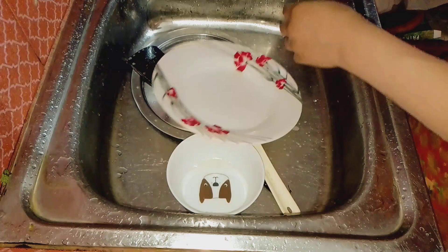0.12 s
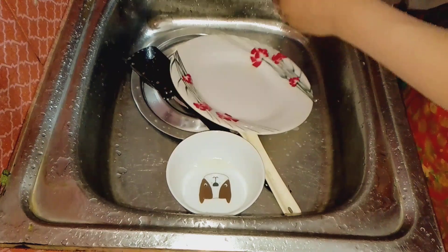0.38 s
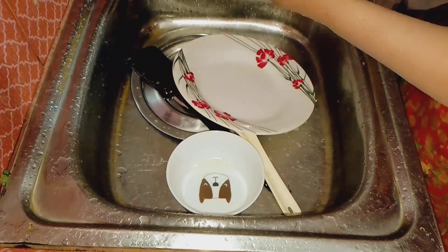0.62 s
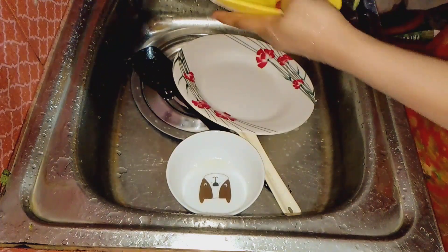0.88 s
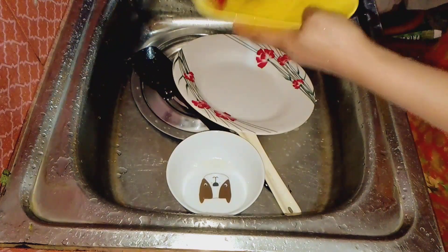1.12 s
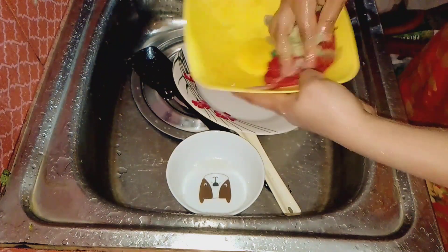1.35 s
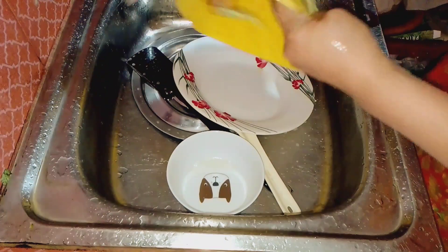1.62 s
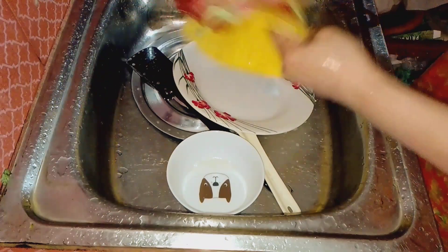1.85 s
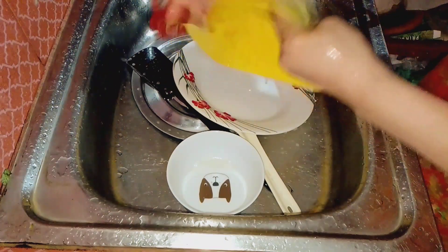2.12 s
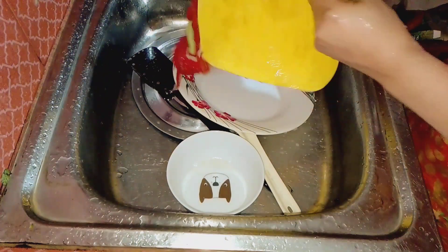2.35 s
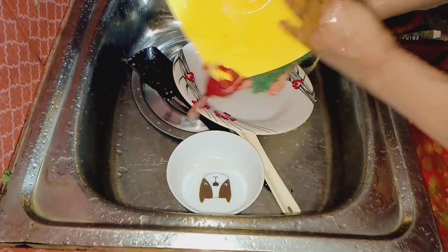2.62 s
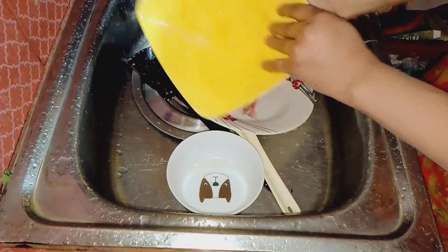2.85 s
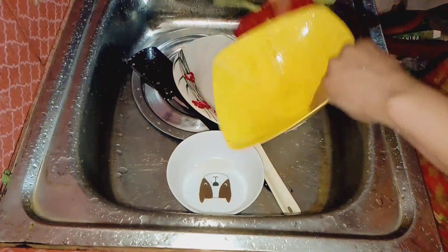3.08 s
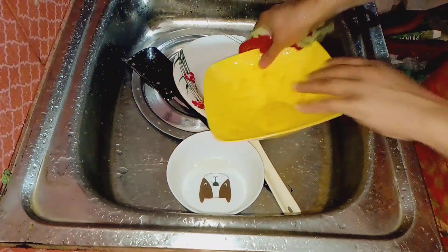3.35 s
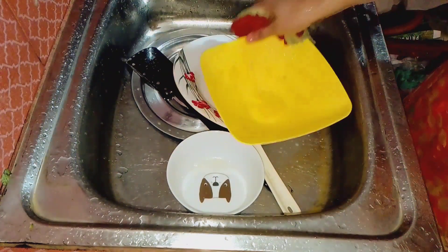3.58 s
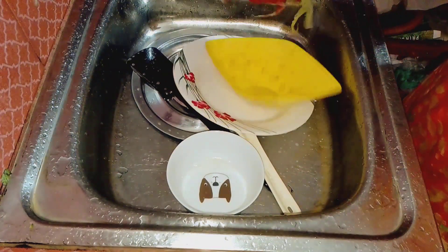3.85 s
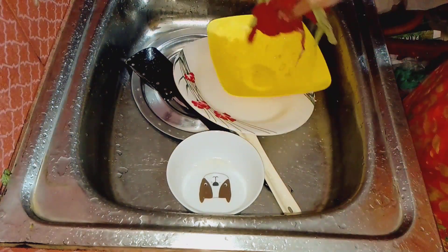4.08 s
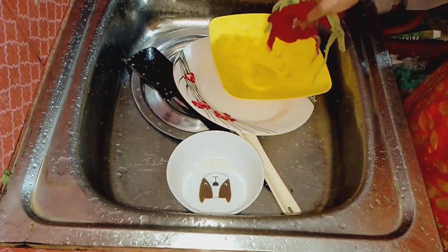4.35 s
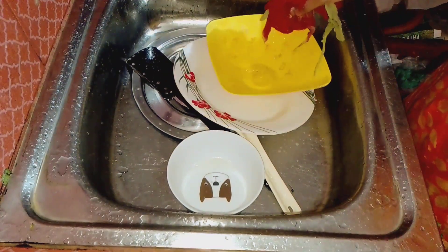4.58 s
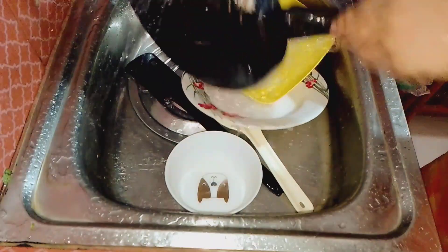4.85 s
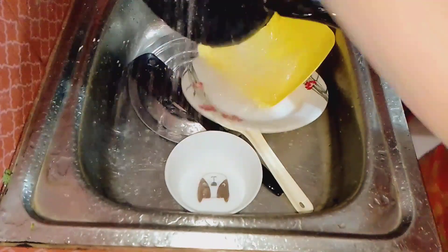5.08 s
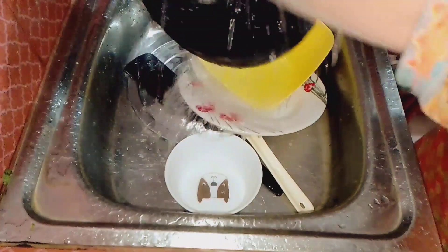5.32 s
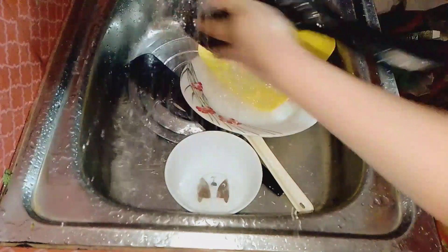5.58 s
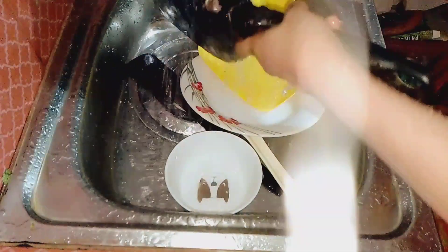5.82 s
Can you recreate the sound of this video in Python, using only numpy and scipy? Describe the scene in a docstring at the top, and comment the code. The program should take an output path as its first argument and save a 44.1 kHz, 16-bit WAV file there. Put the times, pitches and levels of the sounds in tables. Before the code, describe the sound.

A close microphone at a metal basin catches a half second of loud plate clatter, then faint sponge hiss with tiny squeaks over low room noise. Two clusters of dull and sharp dish knocks come next. Abruptly the tap is running: pan knocks, water drumming on metal, bright splashing and bubbling until the end, in a small hard kitchen.

```python
"""Washing up at a steel sink

Plates and a plastic dish clatter, a sponge scrubs the dish, then a pan knocks under a splashing, gurgling tap.
Contacts excite decaying modes; sponge, spray, drumming and room are coloured noise; bubbles are gliding tones.
Two edits leave a few milliseconds of silence; the second ends scrub and murmur and starts the tap."""
import sys
import numpy as np
from scipy import signal
from scipy.fft import rfft, irfft
from scipy.io import wavfile
from scipy.ndimage import uniform_filter1d

SR = 44100
rng = np.random.default_rng(int(sys.argv[2]) if len(sys.argv) > 2 else 0)


def materialize(psi):
    """Save the field psi as 16-bit PCM at rate SR to the path in sys.argv[1].

    A 1-D psi becomes a single channel; in a 2-D psi each row is a channel.
    """
    bounded = np.clip(np.atleast_2d(psi).T, -1, 1)
    quanta = np.round(bounded * 32767).astype(np.int16)
    wavfile.write(sys.argv[1], SR, quanta)


def gain_from_db(level_db):
    """Convert decibel levels to linear amplitude factors (20 dB per decade)."""
    decades = np.asarray(level_db, float) / 20
    return 10 ** decades


N = 262395
T = np.arange(N) / SR

# Silent gaps at the edits. Each row: start in seconds, end in seconds.
GAPS = [(1.527, 1.532), (4.665, 4.679)]
SCRUB_END_S, TAP_ON_S = GAPS[1]


def colour(x, points):
    """Causal minimum-phase filter by (Hz, dB) points, made from the folded cepstrum."""
    hz, db = np.transpose(points)
    size = 8192
    grid_hz = np.arange(size // 2 + 1) * SR / size
    log_gain = np.interp(np.log(grid_hz + 1), np.log(hz), db) * np.log(10) / 20
    cepstrum = irfft(log_gain)
    cepstrum[1:size // 2] *= 2
    cepstrum[size // 2 + 1:] = 0
    response = irfft(np.exp(rfft(cepstrum)))
    return signal.fftconvolve(x, response)[:len(x)]


def band(x, lo_hz, hi_hz):
    """Butterworth band-pass."""
    return signal.sosfilt(signal.butter(2, [lo_hz, hi_hz], "bandpass", fs=SR, output="sos"), x)


def unit(x, lo_hz, hi_hz):
    """Scale so that one band has rms 1."""
    return x / np.std(band(x, lo_hz, hi_hz))


def above(x, hz, order=4):
    """The share of x above hz, with no phase turn."""
    f = np.arange(len(x) // 2 + 1) * SR / len(x)
    return irfft(rfft(x) / (1 + (hz / (f + 1)) ** order), len(x))


def walk(rate_hz):
    """Random levels held 1 / rate_hz and slewed twice; spread 1."""
    k = int(SR / rate_hz)
    held = np.repeat(rng.standard_normal(N // k + 1), k)
    w = uniform_filter1d(uniform_filter1d(held, k), k)[:N]
    return w / np.std(w)


def patchy(x, depth_db, rate_hz):
    """Neighbouring frequency slices of a noise swell and sink on their own."""
    edges_hz = 900 * 1.17 ** np.arange(14)
    tops = [x] + [above(x, f, order=16) for f in edges_hz]
    slices = [a - b for a, b in zip(tops, tops[1:])]
    return tops[-1] + sum(part * gain_from_db(depth_db * walk(rate_hz)) for part in slices)


def clicks(size, rate_hz, spread_db):
    """Random contacts; an exponential draw lifts some (spread_db > 0) or weakens some (< 0)."""
    hit = rng.random(size) < rate_hz / SR
    spread = np.minimum(rng.exponential(size=size), 3.)
    return hit * rng.standard_normal(size) * gain_from_db(spread_db * spread)


def fade(t, t60):
    """Exponential decay, 60 dB in t60."""
    return np.exp(-np.log(1000) * t / t60)


def add(out, s, sound):
    """Mix a sound in at s seconds."""
    i = int(s * SR)
    out[i:i + len(sound)] += sound[:N - i]


def kitchen(x, wet_db):
    """Tiled walls: a noise tail, drawn anew per call, that dies sooner in the treble."""
    # Reverberation. Each row: frequency in Hz, t60 in seconds.
    tail_t60 = [(200, 0.34), (1000, 0.28), (4000, 0.26), (12000, 0.25)]
    t, (hz, t60_s) = T[:SR // 2], np.transpose(tail_t60)
    tail = np.zeros(len(t))
    for f in 125 * 2. ** np.arange(7):
        octave = band(rng.standard_normal(len(t)), f / 2 ** .5, f * 2 ** .5)
        tail += octave * fade(t, np.interp(np.log(f), np.log(hz), t60_s))
    tail = tail * np.clip(t / 0.0071, 0, 1)
    return x + gain_from_db(wet_db) * signal.fftconvolve(x, tail / np.linalg.norm(tail))[:len(x)]


def struck(modes, damping):
    """Unit-energy response to one tap: decaying modes in a mix that varies with the spot."""
    t = T[:SR // 2]
    hz, db, t60_s = (c[:, None] for c in np.transpose(modes))
    db = db + 4.4 * rng.standard_normal(db.shape)
    sound = np.sum(gain_from_db(db) * np.sin(2 * np.pi * hz * t) * fade(t, damping * t60_s), axis=0)
    return sound / np.linalg.norm(sound)


def body(contact, s, ring_hz, ring_db):
    """Contacts crack, ring the touched spot and shake the basin and the plate or pan in hand at s."""
    # Modes of the steel basin with its dishes, the china plate and the steel pan.
    # Each row: frequency in Hz, mean relative level in dB, t60 in seconds before the damping factor.
    basin_modes = [(298.6, 5.5, 0.98), (547.5, 4, 0.63), (653, -4.5, 0.86), (796, -8, 0.61),
                   (1010, -4, 0.53), (1030, -24, 0.53), (1180, -10, 0.26), (1287, -16, 0.18),
                   (1306, -19.5, 0.32), (1645, -13, 0.21), (1619, -14, 0.33), (1780, -27, 0.26),
                   (1960, -24, 0.29), (2110, -16, 0.98), (2440, -10, 0.31), (2380, -13, 0.17),
                   (2799, -21, 0.31), (2900, -9, 0.12), (3150, -25, 0.33), (3300, -4, 0.15),
                   (3620, -35, 0.8), (3700, -17, 0.35), (4140, -27, 0.26), (4740, -26, 0.15)]
    plate_modes = [(1246, 6, 0.056), (1502, -1.5, 0.1), (2150, -5, 0.57), (2400, -4, 0.18),
                   (2940, -11, .25), (3100, -10, 0.16), (3480, -2.5, 0.099), (3650, -18, 0.11),
                   (4710, -11.5, 0.18), (5110, -30, 0.052), (5940, -17, 0.11)]
    pan_modes = [(307, -6, 0.27), (366, -7, 0.18), (526, 0, 0.76), (606, -9, 0.3), (717, 0.5, 0.37),
                 (950, 3, 0.12), (1130, -19, 0.059), (1290, -13, .15), (1480, -19, 0.13), (1645, -22, 0.13),
                 (2030, 6, 0.055)]
    # Spectrum of the crack. Each row: frequency in Hz, relative density in dB per Hz.
    crack_colour = [(30, -43), (90, -15), (150, -48.5), (200, 1.5), (290, 3), (400, 3), (530, 1.5),
                    (1400, 4), (2500, -1), (4500, -11.5), (7500, -35.5), (10000, -37.5), (13000, -50),
                    (15500, -49)]
    piece = 0
    if s < 1:
        piece = gain_from_db(-9.5) * struck(plate_modes, 0.54)
    elif s > SCRUB_END_S:
        piece = gain_from_db(-7) * struck(pan_modes, 1.0)
    spot = gain_from_db(ring_db) * struck([(ring_hz, 0, .04)], 0.99)
    crack = colour(np.eye(1, SR // 2)[0], crack_colour)
    rings = colour(gain_from_db(-8.5) * struck(basin_modes, 0.29) + piece + spot, [(150, -20.0), (200, 0.5)])
    return signal.fftconvolve(contact, crack / np.linalg.norm(crack) + rings)[:len(contact)]


def slide():
    """The plate grates across the pile before it settles: dense contacts ring plate and basin."""
    # Grating level. Each row: time in seconds, level in dB.
    slide_levels = [(0, -25), (.05, -24), (.09, -24), (.11, -27.5), (.17, -23.5), (.22, -23), (0.298, -46)]
    s, db = np.transpose(slide_levels)
    t = T[:SR // 2]
    contact = clicks(len(t), rate_hz=3500.0, spread_db=1.0)
    grate = kitchen(body(contact, 0, 1315.0, -2.5), wet_db=-3.0)
    out = np.zeros(N)
    add(out, 0, gain_from_db(np.interp(t, s, db, right=-120)) * grate / np.std(grate))
    return out


def murmur():
    """Low room noise that the basin colours, over a soft steady hiss."""
    # Low noise level. Each row: time in seconds, mean level in dB.
    murmur_levels = [(.72, -51.5), (.9, -60.5), (1.15, -56.5), (1.5, -60), (2.05, -61.5), (2.2, -60),
                     (3.38, -58.5), (3.85, -54), (4.27, -59), (4.66, -61.5)]
    # Spectra of low noise and hiss. Each row: frequency in Hz, relative density in dB per Hz.
    room_colour = [(12, -28), (20, -11), (22, -49), (59, -12), (75, -22), (96, -4.5), (157, -36),
                   (185, -13), (251, -13.5), (290, 0.5), (329, -5), (642, -13), (990, -12.5), (1500, -12),
                   (1950, -17), (3300, -120)]
    hiss_colour = [(470, -28), (800, -8.5), (952, -15), (1230, -16), (1430, -8.5), (3540, -8), (6670, -29),
                   (8760, -29), (12700, -46), (15500, -52)]
    s, db = np.transpose(murmur_levels)
    level_db = np.interp(T, s, db) + 1.8 * walk(10.0)
    low = unit(colour(rng.standard_normal(N), room_colour), 200, 555)
    hiss = unit(colour(rng.standard_normal(N), hiss_colour), 1430, 5300)
    return gain_from_db(level_db) * low + gain_from_db(-62) * hiss


def scrub():
    """Wet sponge on plastic: fine hiss with foam crackle, driven by strokes that speed up, hold and slow."""
    # Strokes. Each row: start in seconds, length in seconds, level in dB, treble lift in dB.
    strokes = [(0.67, .19, -56, -5), (0.9, 0.36, -54.5, -1.5), (1.043, 0.2, -51.5, -4),
               (1.175, .26, -52.5, 0), (1.428, 0.16, -50.5, -4), (1.53, 0.28, -52, 3),
               (1.816, 0.24, -51, 1.5), (2.043, 0.35, -51, 3.5), (2.367, 0.47, -50.5, 1.5),
               (2.78, 0.14, -52, -4.5), (2.877, 0.33, -51.5, 1), (3.173, 0.18, -49, -4.5),
               (3.625, 0.28, -56.5, -4.5), (4.345, 0.075, -58, -1)]
    # Spectrum of the rub. Each row: frequency in Hz, relative density in dB per Hz.
    sponge_colour = [(290, -32), (500, -11), (638, -23), (1040, -5.5), (1130, -13), (1390, -13),
                     (1820, -3.5), (2390, -1), (2570, -0.5), (3960, -2), (7450, -17.5), (9370, -15),
                     (12700, -30.5), (15500, -26)]
    creep_db, creep_treble_db, creep_end_s = -57, -7, 3.7  # faint steady rub under the strokes
    rise_s, fall_s, treble_power = 0.056, 0.078, 0.99  # treble amplitude goes as speed ** treble_power
    power = gain_from_db(2 * creep_db) * (T < creep_end_s)
    treble = power * gain_from_db(2 * creep_treble_db)
    for s, length_s, level_db, treble_db in strokes:
        speed = np.clip(np.minimum((T - s) / rise_s, (s + length_s - T) / fall_s), 0, 1)
        power = power + (gain_from_db(level_db) * speed) ** 2
        treble = treble + (gain_from_db(level_db + treble_db) * speed ** treble_power) ** 2
    crackle = 0.54 * clicks(N, rate_hz=1600.0, spread_db=-3.0)
    rub = colour(rng.standard_normal(N) + crackle, sponge_colour)
    rub = unit(patchy(rub, depth_db=2.5, rate_hz=16.0), 1740, 4300)
    high = above(rub, 5600.0)
    return np.sqrt(power) * (rub - high) + np.sqrt(treble) * high


def knocks():
    """Each knock is a blow and a dying chatter of re-contacts."""
    # Knocks. Each row: start in seconds, rms level of the first 33 ms in dB, ring of the touched
    # spot in Hz, bass lift in dB, treble lift in dB.
    blows = [(0.015, -46, 1270, 2, 15), (0.053, -30, 1350, 2, -5), (0.062, -19, 620, 6, 3.5),
             (0.086, -16, 837, -3.5, 0.5), (0.12, -12, 2150, -5.5, -0.5), (0.19, -18.5, 1380, 3, -13),
             (0.266, -27, 1350, 3.5, 3), (0.378, -15.5, 1310, 0.8, 1.5), (0.394, -14.5, 1220, 1.5, 2),
             (0.411, -19, 980, 6.5, 0), (0.431, -20.5, 1270, 3, -34), (0.472, -16.5, 2440, 4.5, 2),
             (0.495, -16, 1530, -13, -5.5), (0.534, -21.5, 1030, 3, 3.5), (3.406, -20.5, 1550, 11.5, 2.5),
             (3.421, -21, 907, -3, -0.5), (3.44, -24.5, 796, -8, -3.5), (3.833, -53, 1460, 6, 10),
             (3.872, -12.5, 2030, 2, 3), (3.9, -18, 974, -1, 3.5), (3.93, -14.5, 1530, -3, 0.6),
             (3.95, -21, 1460, 1.5, 2.5), (4.011, -16, 1014, -6.5, 1), (4.05, -23.5, 950, 1.5, -8),
             (4.682, -21, 720, 9, 0.6), (4.695, -15.5, 525, 2.5, 0), (4.734, -21, 1450, -4, 5.5),
             (4.801, -16, 1325, -2.5, 2), (4.89, -23, 2100, -2.5, 12), (4.963, -21, 975, -10, 8.5),
             (5.147, -20.5, 1100, -12.5, 1), (5.164, -19.5, 950, -4, -6), (5.185, -28, 412, 0.5, -4),
             (5.5, -28, 3340, -3, 17.5)]
    chatter_t60_s, spot_db, neutral_push_s = 0.064, -8.5, .00135
    out, t = np.zeros(N), T[:SR // 2]
    for s, level_db, ring_hz, bass_db, treble_db in blows:
        contact = clicks(len(t), rate_hz=3500., spread_db=2.) * fade(t, chatter_t60_s)
        push_s = neutral_push_s * gain_from_db(bass_db)  # a duller blow is a longer push
        contact = contact * np.clip(t / push_s, 0, 1)
        contact[0] = min(3., 0.0023 / push_s)
        tilt = [(320, bass_db), (750, 0), (2500, 0), (4000, treble_db)]
        sound = colour(body(contact, s, ring_hz, spot_db), tilt)
        sound = kitchen(sound, wet_db=-3.5)
        attack = np.std(sound[:SR // 30])
        add(out, s, gain_from_db(level_db) * sound / attack)
    return out


def squeaks():
    """The sponge catches briefly and one patch of the dish sings roughly: narrow-band noise."""
    # Squeaks. Each row: start in seconds, level at full swell in dB, pitch in Hz, length in seconds.
    catches = [(1.1, -48, 1830, 0.056), (1.115, -54, 2600, 0.078), (1.261, -53, 1090, 0.074),
               (1.619, -50, 2250, .06), (2.156, -53, 444, 0.11), (3.072, -50, 1020, 0.051),
               (4.359, -60, 3200, 0.071)]
    out, t = np.zeros(N), T[:SR // 4]
    for s, db, hz, length_s in catches:
        tone = band(rng.standard_normal(len(t)), hz / 1.03, hz * 1.03)
        swell = np.sin(np.pi * np.clip(t / max(length_s, .01), 0, 1)) ** 2
        add(out, s, gain_from_db(db) * swell * tone / np.std(tone))
    return out


def bubbles(rows, cycles):
    """Short tones that glide up as the bubble closes, 60 dB down after 2 * cycles."""
    out = np.zeros(N)
    for s, db, hz in rows:
        turns = T[:int(2 * cycles / hz * SR)] * hz
        tone = np.sin(2 * np.pi * turns * (1 + 0.046 * turns / cycles))
        add(out, s, gain_from_db(db) * tone * fade(turns, 2 * cycles) * np.clip(turns / 2, 0, 1))
    return out


def tap():
    """Spray of drops on steel, water drumming the pan, fine random bubbles and larger gurgles."""
    # Swells of the low pan noise, mostly just as the pan is knocked. Each row: start in seconds, level of the
    # pan noise in dB, t60 in seconds.
    swells = [(4.785, -21, 0.55), (4.87, -35, 0.12), (4.963, -22.5, 0.096), (5.51, -39.5, 1),
              (5.745, -46, 0.27)]
    # Larger bubbles. Each row: start in seconds, level before envelope and room in dB, starting pitch in Hz.
    gurgle_rows = [(5.272, -22.5, 820), (5.34, -21, 1960), (5.457, -18.5, 1402), (5.481, -27, 950),
                   (5.519, -32, 1970), (5.579, -29.5, 707), (5.695, -23.5, 1690), (5.819, -36, 2000)]
    # Spectra of spray and drumming. Each row: frequency in Hz, relative density in dB per Hz.
    splash_colour = [(590, -61), (1000, -13.5), (1130, -18), (1440, -20), (1600, -15), (2940, 1), (3570, 1),
                     (6560, -12.5), (7440, -19.5), (9150, -14.5), (10100, -17.5), (12300, -28.5),
                     (15500, -30.5)]
    drum_colour = [(24, -76), (40, -53), (86, -13), (156, -25.5), (189, -17.5), (285, 0.5), (409, -3),
                   (531, 2.5), (737, -5.5), (2000, -5.5), (2600, -15), (4400, -120)]
    splash_db, drum_db, jet_rise_s, swell_rise_s = -26.5, -43, 0.027, 0.013
    jet = np.clip((T - TAP_ON_S) / jet_rise_s, 0, 1)
    beat = gain_from_db(drum_db)
    for s, db, t60_s in swells:
        beat = beat + gain_from_db(db) * np.clip((T - s) / swell_rise_s, 0, 1) * fade(np.maximum(T - s, 0), t60_s)
    drops = 1.5 * clicks(N, rate_hz=2200.0, spread_db=3.0)
    spray = colour(rng.standard_normal(N) + drops, splash_colour)
    spray = unit(spray, 2270, 5600) * gain_from_db(0.51 * walk(25.))
    spray = patchy(spray, depth_db=1.5, rate_hz=34.0)
    chance = rng.random((260, 3))
    start_s, level_db = 4.68 + 1.26 * chance[:, 0], 9 * chance[:, 1]
    pitch_hz = 2200 * 2 ** (0.97 * chance[:, 2])
    fizz = bubbles(zip(start_s, level_db, pitch_hz), cycles=9.3)
    fizz = gain_from_db(-18) * kitchen(fizz, wet_db=-8)
    drum = unit(colour(rng.standard_normal(N), drum_colour), 340, 1300) * gain_from_db(2. * walk(20.))
    water = gain_from_db(splash_db) * (spray + fizz) + beat * drum
    gurgles = kitchen(bubbles(gurgle_rows, cycles=20.0), wet_db=-9.5)
    return water * jet + gurgles


def scene():
    """All sources at one close microphone; scrub and murmur stop at the second edit."""
    steady = (murmur() + scrub()) * (T < SCRUB_END_S)
    return (slide() + steady + knocks() + squeaks() + tap())[None]


def top_cut(x):
    """Nothing passes above the cut-off."""
    return signal.sosfilt(signal.butter(12, 16700, fs=SR, output="sos"), x)


def record(dry):
    """Soft ceiling on the peaks, a bass cut, a small converter offset, the two silent edits."""
    ceiling, offset = .68, -.0004
    out = ceiling * np.tanh(dry / ceiling)
    out = signal.sosfilt(signal.butter(2, 45., "highpass", fs=SR, output="sos"), out) + offset
    for start_s, end_s in GAPS:
        out = out * np.clip(np.maximum(start_s - T, T - end_s) / 0.00072, 0, 1)
    return top_cut(out)


dry = scene()
out = record(dry)
materialize(out)
```